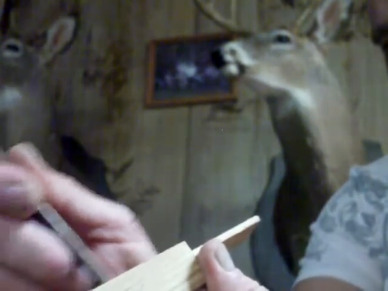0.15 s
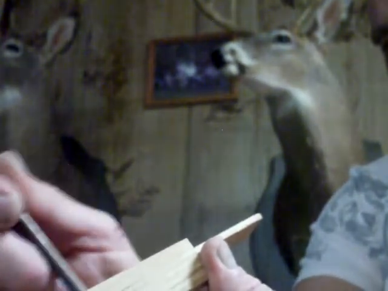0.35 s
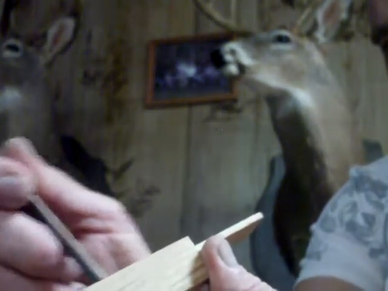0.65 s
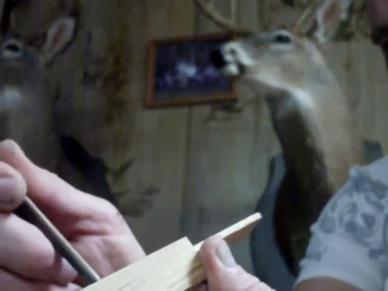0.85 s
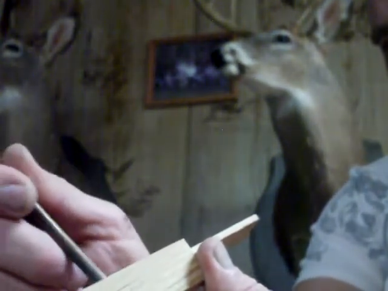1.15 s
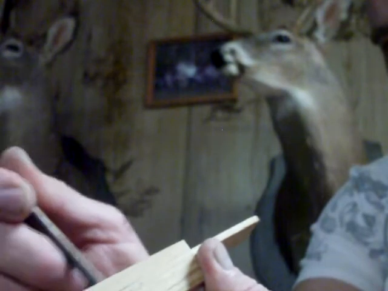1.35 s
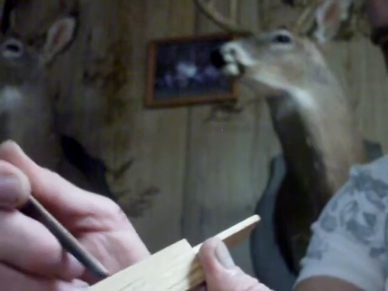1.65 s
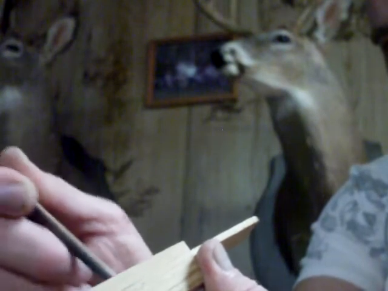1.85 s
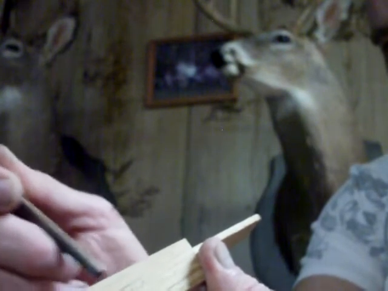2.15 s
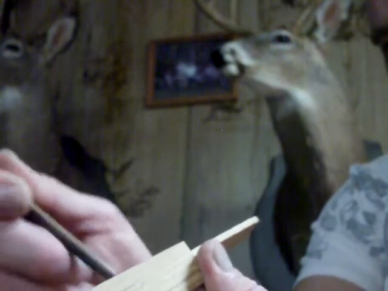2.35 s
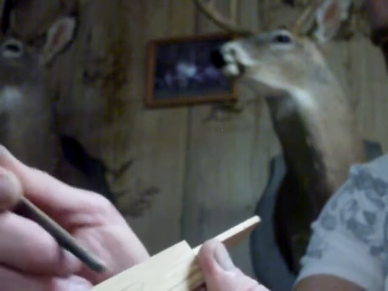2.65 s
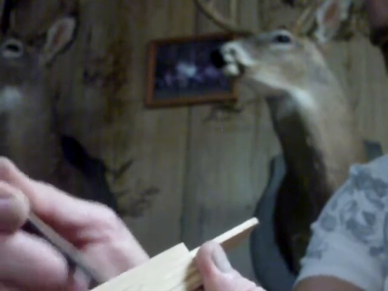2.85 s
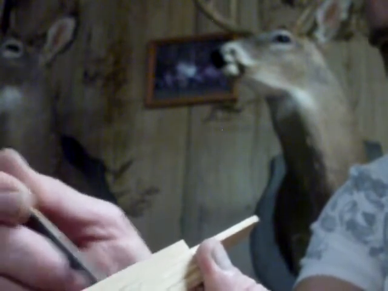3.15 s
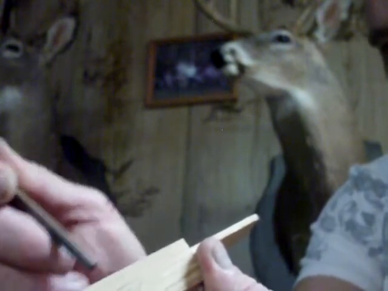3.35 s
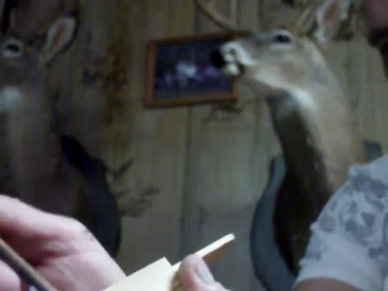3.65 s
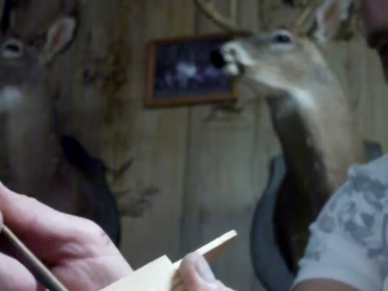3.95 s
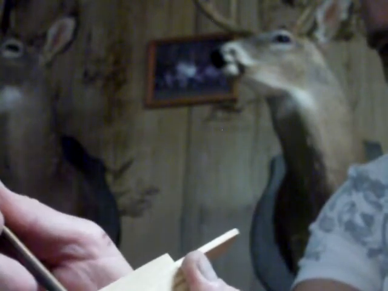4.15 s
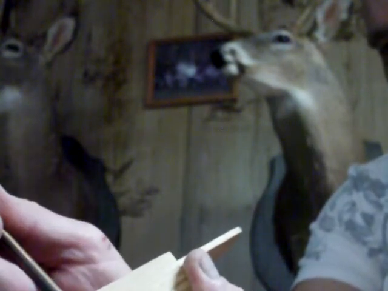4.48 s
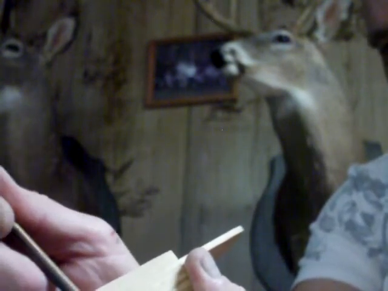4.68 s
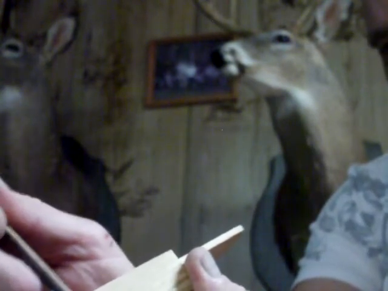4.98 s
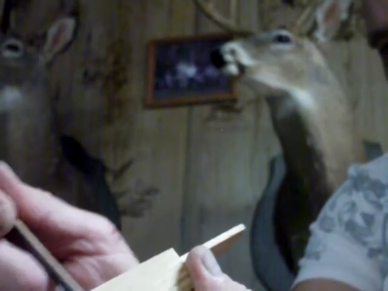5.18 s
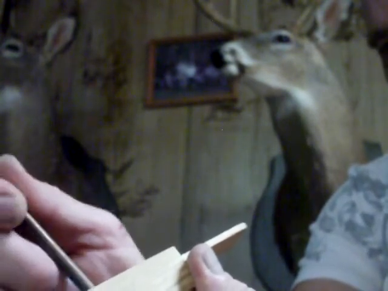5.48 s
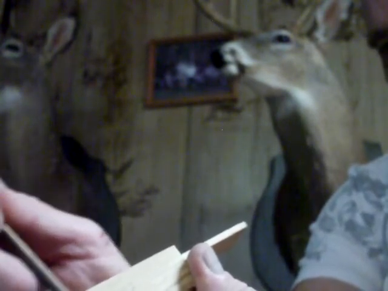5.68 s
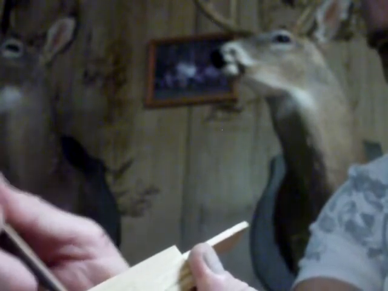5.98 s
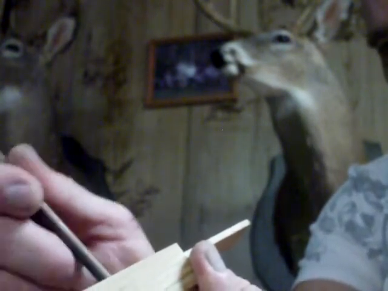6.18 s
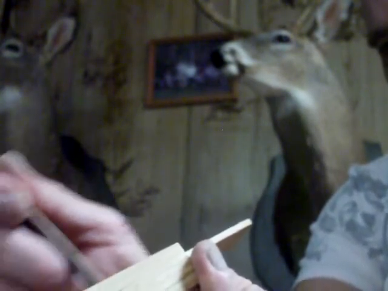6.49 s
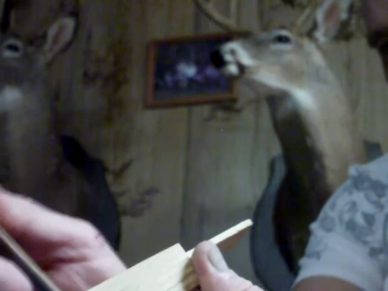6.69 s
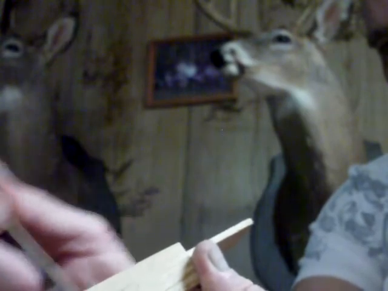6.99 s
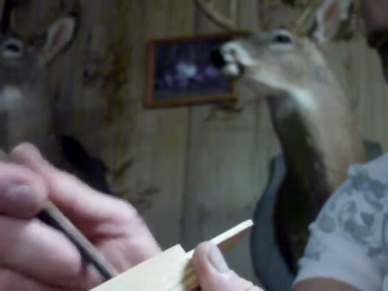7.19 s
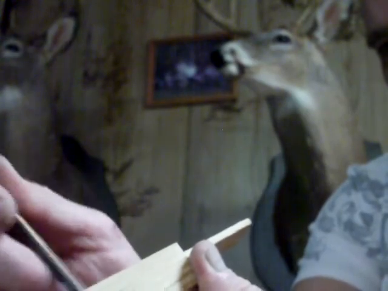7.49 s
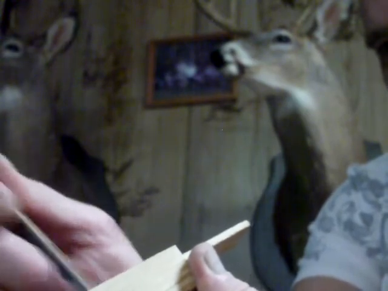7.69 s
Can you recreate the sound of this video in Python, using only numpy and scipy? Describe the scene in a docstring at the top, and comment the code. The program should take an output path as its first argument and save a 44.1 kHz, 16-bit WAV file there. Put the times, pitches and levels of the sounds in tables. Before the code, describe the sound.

A wooden friction turkey call makes raspy yelps and a run of sharp, clipped notes in a quiet room.

```python
"""A striker is scraped by hand over a small wooden friction turkey call in a quiet, panelled room.
First come two slow, raspy yelps: the tip sticks and slips some 700 times a second and drives the
resonances of the hollow box, brushing faintly on its way back. Hard flicks then make a run of sharp
cuts. After a pause the tip is set down with a tick, a series of yelps grows from soft to loud,
and two more cuts end the calling."""
import sys
import numpy as np
from scipy import signal
from scipy.fft import rfft, irfft
from scipy.io import wavfile
from scipy.ndimage import uniform_filter1d, map_coordinates

SR = 44100
rng = np.random.default_rng(int(sys.argv[2]) if len(sys.argv) > 2 else 0)


def transcribe(u):
    """Save the signal u as a 16-bit wav file named by the first command-line argument.

    u: samples, shape (n,) or (channels, n), limited to [-1, 1]; the rate is SR.
    q: integer samples, one column per channel.
    """
    v = np.clip(np.atleast_2d(u).T, -1, 1)
    q = np.round(v * 32767).astype(np.int16)
    wavfile.write(sys.argv[1], SR, q)


N = 345300
TIME = np.arange(N) / SR

# spectrum of the room tone and hiss: frequency_hz, relative_density_db
NOISE_SPECTRUM = [(12, -39), (20, -1.5), (64, -4), (139, -8.5), (235, -8.5), (310, -10.5), (347, -10.5),
                  (865, -18.5), (940, -16.5), (1020, -17.5), (6530, -34.5), (12000, -41), (15000, -60)]
# faint steady tones: frequency_hz, level_db
HUM_TONES = [(120, -88), (237, -90.5), (3935, -99), (11800, -102)]
# reverberation time of the room: frequency_hz, t60_s
ROOM_DECAY = [(200, 0.32), (1500, 0.21), (2850, 0.22), (3450, 0.23), (4300, 0.29), (6600, 0.25),
              (12000, 0.17)]
# colour of the reverberation: frequency_hz, gain_db
ROOM_GAIN = [(300, 4.5), (1400, -1.5), (2850, 4), (3450, 1.5), (6600, 1.5), (12000, 9)]

# broad radiation curve of the box: frequency_hz, gain_db
BOX_RADIATION = [(100, -59), (400, -21), (650, -18), (1050, -7), (1300, -7.5), (2100, -8), (2450, -11.5),
                 (3600, -10.5), (4600, -22.5), (5700, -29), (7200, -24), (9500, -33.5), (12000, -45),
                 (15000, -61)]
# resonances of box and striker, above that curve: centre_hz, width_hz, boost_db
BOX_RESONANCES = [(667.6, 70, 9), (1380, 277, 8.5), (1680, 170, 7), (1887, 110, 9.5), (2078, 160, 4),
                  (2877, 400, 11.5), (3422, 240, 11), (6420, 860, 14), (6653, 140, 11), (8430, 900, 6),
                  (11670, 400, 7)]
# lightly damped modes of the wood: frequency_hz, gain_db, t60_s
WOOD_MODES = [(3530, -4, .42), (3380, -5, 0.24), (6360, -9.5, 0.49)]

# light return strokes: middle_s, length_s, level_db
RETURN_STROKES = [(.01, 0.15, -60.5), (0.349, 0.17, -61.5), (4.833, 0.12, -75.5), (5.261, 0.11, -68),
                  (5.618, 0.088, -64.5), (5.992, 0.12, -64), (6.338, 0.14, -63.5), (6.69, 0.14, -61.5),
                  (7.032, 0.17, -65)]
# friction noise of the unloaded tip: frequency_hz, gain_db
BRUSH_SPECTRUM = [(600, -19.5), (1400, -0.5), (1700, -8.5), (3400, -6.5), (5000, 8.5), (6600, 2.5),
                  (12000, 12.5), (13000, 11)]
# the tip is set down on the wood: start_s, level_db
TIP_TOUCHES = [(4.46, -55.5), (5.725, -54)]
# dry scraping that goes with the slips: frequency_hz, gain_db
GRIT_SPECTRUM = [(500, -10), (1400, -1), (3400, 2.5), (6600, 6.5), (12000, -3.5)]

# hard flicks: start_s, level_db, length_s, first_slip_hz, relative_snap_db
CUT_STROKES = [(1.1654, -41.5, .018, 846, 11.5), (1.3897, -32.5, 0.021, 854.5, 3.5),
               (1.6144, -40.5, 0.015, 731, 21.5), (1.632, -40, 0.012, 968, -17),
               (1.85, -31.5, 0.024, 917.4, 2), (2.0919, -31.5, 0.022, 891, 6.5),
               (2.342, -30.5, .022, 925.5, 2.5), (2.6007, -29, 0.023, 925, -10.5),
               (2.8745, -28.5, 0.024, 910.4, 1.5), (3.2093, -30.5, 0.018, 976, 5.5),
               (7.549, -30.5, 0.025, 1027, 6), (7.7562, -24.5, .027, 884, -9)]
# colour of a flick, which also shoves the whole box and so adds a low knock: frequency_hz, gain_db
FLICK_SPECTRUM = [(340, 8), (560, 3.5), (700, -1.5), (870, -4.5), (1300, 0), (5000, 0.5), (6600, 3),
                  (9000, 2.5), (13000, 9.5)]

# slow strokes: start_s, length_s, attack_s, level_db, peak_fraction, swell_db, fade_db,
#   low_pitch_hz, rise_hz, bite_s, flip_hz, opening_roughness, held_roughness (both 0-1)
YELP_STROKES = [(0.118, 0.13, 0.016, -34, 0.6, 15.5, 5.5, 720.3, 26, .011, 290, .18, .08),
                (0.467, 0.13, 0.0076, -32, 0.6, 16, 11, 732.8, 7.7, 0.023, 260, 0.13, .03),
                (4.604, 0.071, .028, -49.5, 0.88, 12, 6, 786.5, 27.6, .002, 125, 0.59, .35),
                (4.672, 0.029, 0.0026, -47, 0.47, 5.5, 13, 835, 5.5, 0.0092, 10.4, 0.14, .5),
                (5.003, 0.17, 0.012, -48.5, 0.6, 8, 11, 719.3, 44, .011, 80, .35, .5),
                (5.407, 0.13, 0.009, -38.5, 0.56, 21.5, 19.5, 694.3, 58.4, 0.0022, 4.2, .6, 0.09),
                (5.759, .135, .018, -33, 0.55, 17.5, 14.5, 709.4, 14.4, .003, 240, 0.46, 0.07),
                (6.107, .135, 0.0036, -30, 0.63, 18.5, 19.5, 691.8, 16, 0.0097, 99, 0.27, .05),
                (6.454, 0.15, .003, -31, 0.63, 15, 20.5, 680.7, 37.5, 0.011, 128, 0.64, 0.09),
                (6.789, 0.14, 0.0046, -31.5, 0.76, 15, 11.5, 673.6, 28.6, .01, 11.7, 0.6, 0.05),
                (7.118, 0.13, 0.0049, -28, 0.71, 19, 13.5, 677.1, 51.6, 0.0089, 4.5, 0.68, 0)]
# colour of a firm slow stroke, which releases the tip more softly than a flick: frequency_hz, gain_db
FIRM_SPECTRUM = [(700, -1.5), (2200, 0), (2850, 0), (3400, 0), (4400, -4), (5600, -3), (6500, -3.5),
                 (7300, -4.5), (12000, -5), (12800, -36)]
# colour of a slow stroke under light pressure: frequency_hz, gain_db
LIGHT_SPECTRUM = [(700, 1), (1800, 2), (3400, -9), (4500, -5), (6500, -14), (12000, -39), (13000, -37)]
# hiss of the tip sliding under load: frequency_hz, gain_db
SLIDE_SPECTRUM = [(2500, -20), (4200, 2), (5600, 3), (6500, 2), (7500, 0), (10000, -10), (11900, 0),
                  (12400, -12), (13000, -30)]
# keenness of the tip's edge as its angle changes between strokes: time_s, treble_db
TIP_EDGE = [(.2, 3), (.55, 6), (4.7, 0.5), (5.5, 2), (5.85, 2), (6.5, 3), (7.2, 6)]


def amp(db):
    """Decibels to amplitude ratio."""
    return 10 ** (np.asarray(db) / 20)


def unit(x):
    """x normalised to rms 1."""
    return x / np.sqrt(np.mean(x ** 2) + 1e-20)


def steady(x, size=441):
    """x normalised to a running rms of 1."""
    return x / np.sqrt(np.abs(uniform_filter1d(x ** 2, size)) + 1e-9)


def along(points, hz):
    """Interpolation of (frequency_hz, value) points on a logarithmic frequency axis."""
    f, v = np.transpose(points)
    return np.interp(np.log(hz + 1), np.log(f), v)


def coloured(x, curve, size=4096):
    """x through the minimum-phase filter whose gain in dB is curve(hz)."""
    cepstrum = irfft(np.log(amp(curve(np.fft.rfftfreq(size, 1 / SR)))))
    cepstrum[1:size // 2] *= 2
    cepstrum[size // 2 + 1:] = 0
    return signal.fftconvolve(x, irfft(np.exp(rfft(cepstrum))))[:len(x)]


def noise(spectrum, count=N):
    """Gaussian noise shaped by a spectrum, at rms 1."""
    return unit(coloured(rng.standard_normal(count), lambda f: along(spectrum, f)))


def wobble(rate, count):
    """Smooth random modulation with rate knots a second."""
    knots = rng.standard_normal(int(count * rate / SR) + 4)
    return map_coordinates(knots, [np.arange(count) * rate / SR])


def add(track, start_s, sound):
    """Superpose a sound on the track from start_s."""
    start = round(start_s * SR)
    track[start:start + len(sound)] += sound[:N - start]


def background(noise_db=-68.5):
    """Stationary noise floor: broadband room tone with pure tones of hum and whine."""
    hum = sum(amp(db) * unit(np.sin(2 * np.pi * hz * TIME)) for hz, db in HUM_TONES)
    return amp(noise_db) * noise(NOISE_SPECTRUM) + hum


def reverberation(x, send_db=-8.0, delay_s=.003, size=16384):
    """Diffuse wall reflections decay exponentially; their pattern shifts as the hands move each stroke."""
    wet = np.zeros(N)
    starts = sorted([0] + [round(row[0] * SR) for row in YELP_STROKES + CUT_STROKES])
    for start, end in zip(starts, starts[1:] + [N]):
        hz, t, spectra = signal.stft(rng.standard_normal(size), SR, nperseg=256)
        decay = amp(-60 * t / along(ROOM_DECAY, hz)[:, None])
        tail = signal.istft(spectra * decay, SR, nperseg=256)[1]
        echo = signal.fftconvolve(x[start:end], tail / np.linalg.norm(tail))
        add(wet, start / SR, np.pad(echo, (round(delay_s * SR), 0)))
    return amp(send_db) * coloured(wet, lambda f: along(ROOM_GAIN, f))


def wood_ringing(x, size=16384):
    """Free vibration: lightly damped modes of the wood ring on after each stroke."""
    t, modes = TIME[:size], np.zeros(size)
    for hz, db, t60 in WOOD_MODES:
        decay = amp(-60 * t / t60)
        modes += 2 * amp(db) * decay / decay.sum() * np.cos(2 * np.pi * hz * t)
    return signal.oaconvolve(x, modes)[:N]


def box_db(hz):
    """Frequency response of the box: resonance peaks on a broad radiation curve."""
    peaks = sum(db / (1 + (2 * (hz - centre) / width) ** 2) for centre, width, db in BOX_RESONANCES)
    return along(BOX_RADIATION, hz) + peaks


def drive_box(force, spectrum):
    """Forced vibration: the box filters a force that the contact has coloured with its spectrum."""
    return coloured(force, lambda f: box_db(f) + along(spectrum, f))


def tick(decay_s, size=4096):
    """Impact excitation: a brief noise burst rings all the box's resonances at once; peak 1."""
    burst = rng.standard_normal(size) * np.exp(-np.arange(size) / SR / decay_s)
    ring = coloured(burst, box_db)
    return ring / np.abs(ring).max()


def return_brushes():
    """Sliding friction: the unloaded tip crosses the grain without catching and only hisses in the box."""
    envelope = sum(amp(db) * np.cos(np.pi * np.clip((TIME - middle_s) / length_s, -.5, .5))
                   for middle_s, length_s, db in RETURN_STROKES)
    return envelope * unit(drive_box(rng.standard_normal(N), BRUSH_SPECTRUM))


def touches(cutoff_hz=2200):
    """Soft impact: setting the tip down gives a small, dull tick."""
    track = np.zeros(N)
    for start_s, db in TIP_TOUCHES:
        add(track, start_s, amp(db) * tick(decay_s=0.0042))
    return signal.sosfilt(signal.butter(2, cutoff_hz, fs=SR, output="sos"), track)


def stick_slip(hz, rough, wander, scatter, uneven_db, grit):
    """Relaxation oscillation: one impulse a slip; roughness scatters times and sizes and adds grit."""
    count = len(hz)
    cycles = np.cumsum(hz * (1 + wander * rough * wobble(300, count))) / SR
    slip_at = np.interp(np.arange(1, cycles[-1]), cycles, np.arange(count))  # in samples
    slip_rough, period = rough[slip_at.astype(int)], SR / hz[slip_at.astype(int)]
    jitter, shimmer = rng.standard_normal((len(slip_at), 2)).T
    slip_at = slip_at + scatter * slip_rough * period * jitter
    strength = -amp(uneven_db * slip_rough * shimmer)
    # a windowed sinc places each impulse between samples
    taps = slip_at.astype(int)[:, None] + np.arange(-7, 9)
    offset = taps - slip_at[:, None]
    pulse = np.sinc(offset) * np.cos(np.pi * offset / 16) ** 2
    impulses = np.bincount(np.clip(taps, 0, count - 1).ravel(), (strength[:, None] * pulse).ravel(), count)
    scrape = noise(GRIT_SPECTRUM, count) * np.cos(np.pi * cycles) ** 2
    return unit(impulses) + grit * rough * unit(scrape)


def cuts(bitten_hz=689.5, release_s=0.0016, swell_db=3, size=4096):
    """Static friction gives way with a snap, and the tip skids through a short, rough, falling squeal."""
    track, t = np.zeros(N), np.arange(size) / SR
    for start_s, db, length_s, first_hz, snap_db in CUT_STROKES:
        travel = np.clip(t / length_s, 0, 1)
        hz = np.interp(travel, [.35, .72], [first_hz, bitten_hz])  # slips slow as the tip bites
        rough = np.interp(travel, [0, .45], [.78, .48])  # the coarse grip settles
        envelope = amp(swell_db * (travel - 1)) * np.exp(-np.maximum(t - length_s, 0) / release_s)
        force = envelope * stick_slip(hz, rough, wander=.07, scatter=.1, uneven_db=4, grit=.67)
        skid = drive_box(force, FLICK_SPECTRUM)
        skid_rms = np.sqrt(np.sum(skid ** 2) / (length_s * SR))
        snap = amp(snap_db) * tick(decay_s=0.00028)
        add(track, start_s, amp(db) * (skid / skid_rms + snap))
    return track


def yelp_stroke(t, shape, free_hz=1027, sag_hz=22.11, flip_s=.011, loosen_s=.015, release_s=.0054):
    """Load governs slip rate: the pitch drops as the tip bites, rises as it clears, flips at the lift."""
    (length_s, attack_s, stroke_db, peak_at, swell_db, fade_db,
     low_hz, rise_hz, bite_s, flip_hz, opening_rough, held_rough) = shape
    contact = np.clip(t / attack_s, 0, 1) * np.clip(1 - (t - length_s) / release_s, 0, 1)
    t = np.clip(t, 0, length_s)
    travel, left_s = t / length_s, length_s - t
    swelling = np.minimum(travel / peak_at, 1)
    fading = np.maximum((travel - peak_at) / (1 - peak_at), 0)
    lift_hz = flip_hz * np.exp(-left_s / flip_s)
    level_db = stroke_db - swell_db * (1 - swelling) ** 1.4 - fade_db * fading ** 1.5
    level_db += 0.0067 * lift_hz  # the tip speeds up as it flips off, which makes it louder
    held_hz = low_hz + np.interp(travel, [0, .42, .84], [sag_hz, 0, rise_hz])
    hz = held_hz + (free_hz - held_hz) * np.exp(-(t / bite_s) ** 2) + lift_hz
    rough = np.interp(swelling, [.6, .82], [opening_rough, held_rough])
    rough += .5 * np.exp(-(left_s / loosen_s) ** 2)  # the grip loosens just before the lift
    return level_db, hz, np.clip(rough, 0, 1), contact


def hand_motion():
    """The hand modulates level, slip rate, roughness and contact through each slow stroke in turn."""
    controls = np.zeros((4, N))
    for k, (start_s, *shape) in enumerate(YELP_STROKES):
        now = TIME >= (start_s if k else 0)
        controls[:, now] = yelp_stroke(TIME[now] - start_s, shape)
    return controls


def tip_edge(x, split_hz=5200):
    """A sharper contact excites higher frequencies: a keener edge of the tip adds treble."""
    treble = signal.sosfiltfilt(signal.butter(3, split_hz, "high", fs=SR, output="sos"), x)
    treble_gain = amp(np.interp(TIME, *np.transpose(TIP_EDGE)))
    return x + (treble_gain - 1) * treble


def yelps(light_db=-52.0, firm_db=-33.5, tripling_depth=0.15, rasp_hz=908, rasp_gain=0.32):
    """Self-excited friction oscillation drives the box: raspy when loose, brighter under pressure."""
    level_db, hz, rough, contact = hand_motion()
    # period tripling: under a loose grip the slips fall into groups of three
    triplets = np.sin(2 * np.pi * np.cumsum(hz) / SR / 3 + .5 * wobble(60, N))
    slip_hz = hz * (1 + tripling_depth * rough * triplets)
    force = stick_slip(slip_hz, rough, wander=.018, scatter=.045, uneven_db=3, grit=.37)
    # a second, higher vibration competes with the main one and makes the rasp
    upper_hz = rasp_hz * (1 + .015 * wobble(25, N))
    upper = stick_slip(upper_hz, rough, wander=.018, scatter=.08, uneven_db=6, grit=.2)
    force += rasp_gain * rough * coloured(upper, lambda f: along(LIGHT_SPECTRUM, f))
    light = steady(drive_box(force, LIGHT_SPECTRUM))
    firm = steady(drive_box(force, FIRM_SPECTRUM))
    pressure = np.clip((level_db - light_db) / (firm_db - light_db), 0, 1)
    squeal = steady(pressure * firm + (1 - pressure) * light)
    hiss = amp(-27) * (0.51 + 0.34 * pressure) * noise(SLIDE_SPECTRUM)
    return contact * amp(level_db) * tip_edge(squeal + hiss)


def scene():
    """Superposition of the call's direct sound, the ringing wood, the reverberation and the room tone."""
    call = yelps() + cuts() + return_brushes() + touches()
    return (call + wood_ringing(call) + reverberation(call) + background())[None]


def record(dry, notch_hz=7880, notch_width_hz=280, notch_db=-20, cutoff_hz=15400):
    """Filtering: a notch makes one narrow dip in the treble and a steep low-pass limits the band."""
    notched = coloured(dry[0], lambda f: notch_db / (1 + (2 * (f - notch_hz) / notch_width_hz) ** 4))
    low_pass = signal.ellip(10, .1, 80, cutoff_hz, fs=SR, output="sos")
    return signal.sosfilt(low_pass, notched)[None]


dry = scene()
out = record(dry)
transcribe(out)
```